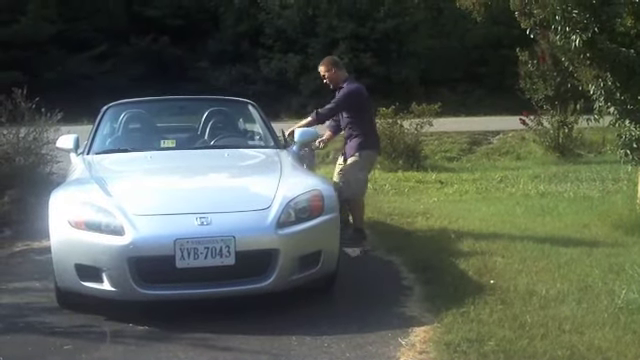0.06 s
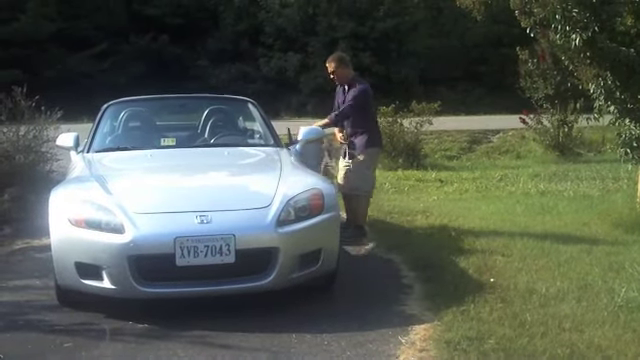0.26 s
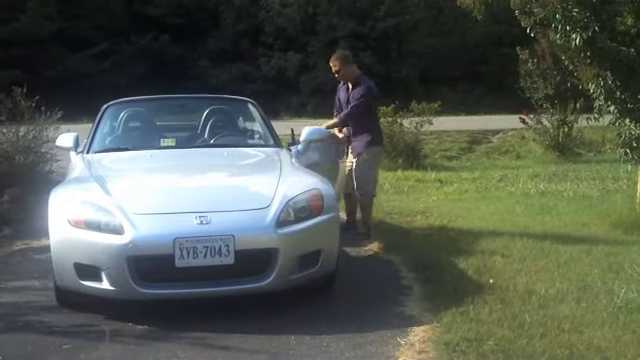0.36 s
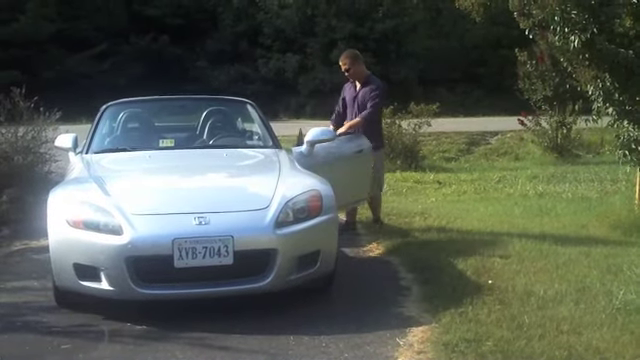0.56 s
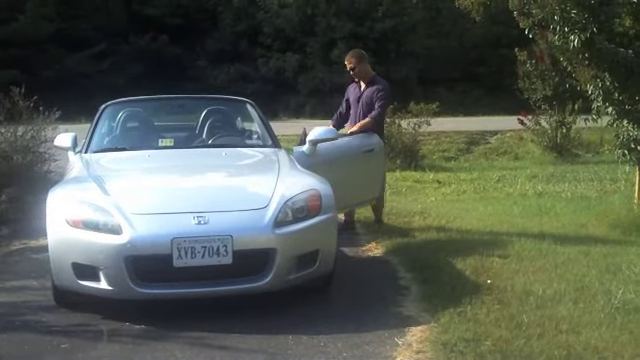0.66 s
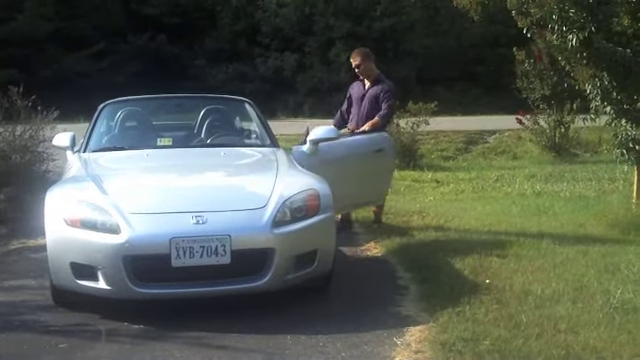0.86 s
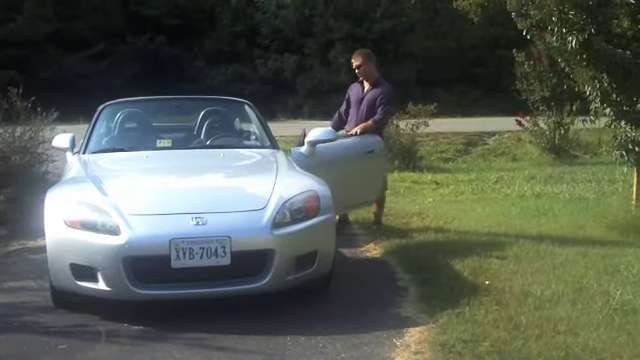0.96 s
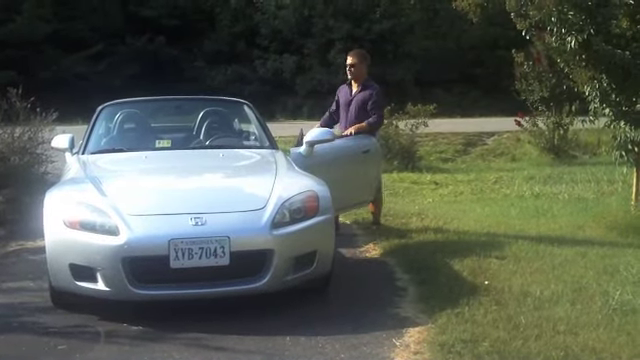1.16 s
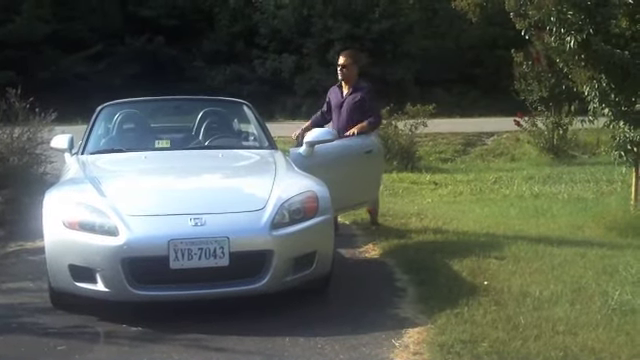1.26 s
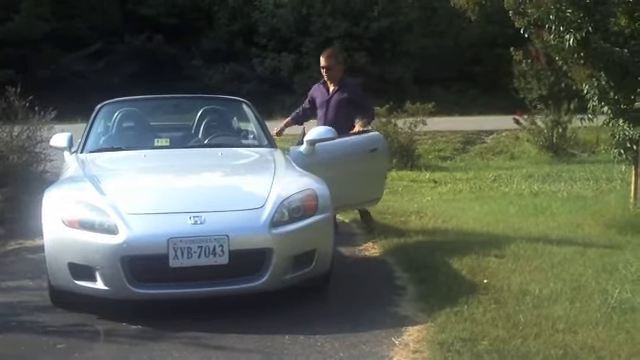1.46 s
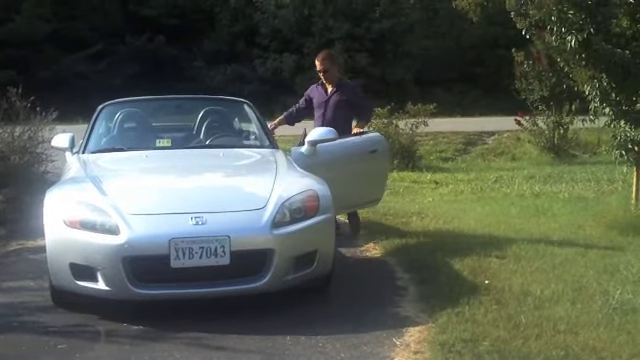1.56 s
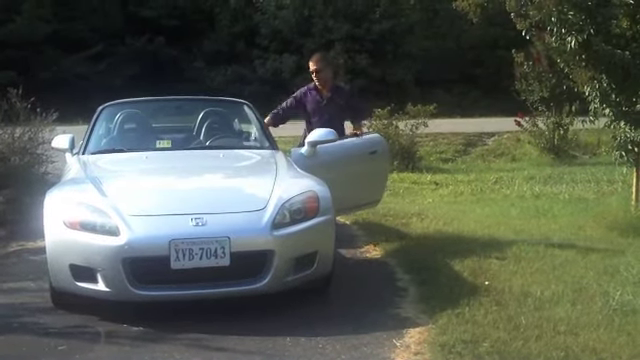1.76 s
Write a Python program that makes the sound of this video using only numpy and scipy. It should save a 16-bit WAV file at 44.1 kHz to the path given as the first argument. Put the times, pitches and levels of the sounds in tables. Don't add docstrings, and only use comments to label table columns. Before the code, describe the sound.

A car door is unlatched with a sharp metallic click and soft thump on a quiet lawn.

```python
import sys
import numpy as np
from scipy import signal
from scipy.fft import rfft, irfft
from scipy.io import wavfile
from scipy.ndimage import uniform_filter1d

SR = 44100
rng = np.random.default_rng(int(sys.argv[2]) if len(sys.argv) > 2 else 0)


def attenuation_scalar(level_db):
    decades = np.asarray(level_db, float) / 20
    return 10 ** decades


def materialize(psi):
    bounded = np.clip(np.atleast_2d(psi).T, -1, 1)
    quanta = np.round(bounded * 32767).astype(np.int16)
    wavfile.write(sys.argv[1], SR, quanta)


N = 79380
TIME_S = np.arange(N) / SR


def unit(x):
    return x / np.sqrt(np.mean(x ** 2))


def noise():
    return rng.standard_normal(N)


def band(x, hz, width_hz):
    return signal.lfilter(*signal.iirpeak(hz, hz / width_hz, SR), x)


def band_twice(x, hz, width_hz):
    return band(band(x, hz, width_hz), hz, width_hz)


def high(x, hz):
    return signal.sosfilt(signal.butter(2, hz, "high", fs=SR, output="sos"), x)


def bell(t, centre, spread):
    return np.exp(-0.5 * ((t - centre) / spread) ** 2)


def ring(x, hz, t60):
    pole = np.exp((2j * np.pi * hz - np.log(1000) / t60) / SR)
    return signal.lfilter([1], [1, -pole], x + 0j).imag


def strike(force, modes):
    return sum(attenuation_scalar(db) * ring(force, hz, t60) for hz, db, t60 in modes)


def push(start_s, length_s):
    u = np.clip((TIME_S - start_s) / length_s, 0, 1)
    return np.sin(np.pi * u) ** 2 * 2 / (length_s * SR)


def fade(start_s, t60):
    return (TIME_S > start_s) * attenuation_scalar(-60 * np.abs(TIME_S - start_s) / t60)


def walk(rate_hz):
    hold = int(SR / rate_hz)
    steps = np.repeat(rng.standard_normal(N // hold + 1), hold)
    return 1.3 * uniform_filter1d(uniform_filter1d(steps, hold), hold)[:N]


# (frequency [Hz], density [dB per Hz])
AIR_SPECTRUM = [(12, -31), (20, 1.5), (59, -0.5), (86, -7), (274, -18), (355, -16), (419, -19), (1050, -27),
                (5600, -42.5), (7280, -52), (12300, -120)]


def air():
    swell_db, flicker_db = 0.76, 1.44
    out, swell = 0, walk(1.49)
    hz_all = np.maximum(np.fft.rfftfreq(N, 1 / SR), 1)
    table_hz, table_db = np.transpose(AIR_SPECTRUM)
    colour = attenuation_scalar(np.interp(np.log(hz_all), np.log(table_hz), table_db))
    for hz in 20 * 2 ** np.arange(0, 9, 0.5):
        share = np.cos(np.pi * np.clip(np.log2(hz_all / hz), -0.5, 0.5)) * colour
        level = attenuation_scalar(swell_db * swell + flicker_db * walk(8.65))
        out = out + level * irfft(share * rfft(noise()), N)
    return attenuation_scalar(-48.5) * unit(out)


# (time [s], spread [s], level [dB])
GRASS_STEPS = [
    (.06, .05, -67),
    (.42, .05, -68),
    (.66, .04, -72),
    (1.27, .07, -64),
    (1.58, .045, -64),
]


def grass():
    shape = sum(attenuation_scalar(db) * bell(TIME_S, s, spread) for s, spread, db in GRASS_STEPS)
    grains = noise() * attenuation_scalar(2.5 * walk(60.9))
    return shape * unit(band(grains, 650, 1100))


# (start [s], length [s], top pitch [Hz], level [dB])
BIRD_NOTES = [
    (.044, .046, 1125, -63),
    (.156, .046, 1125, -61),
    (.444, .042, 1070, -63.5),
    (.612, .033, 1060, -65),
]
# (multiple [1], level [dB], strongest place in note [0-1], spread [0-1])
BIRD_OVERTONES = [
    (1, -20, .5, .5),
    (2, 0, .75, .9),
    (3, -3, .68, .22),
    (4, -7, .27, .11),
]


def bird():
    arch_top, rise, fall = 0.48, 0.17, 0.22
    edge_s, rough_db, wobble = 0.0017, 2.5, 0.013
    out = 0
    for s, length, hz, db in BIRD_NOTES:
        u = np.clip((TIME_S - s) / length, 0, 1)
        rising = rise * (1 - u / arch_top) ** 2
        falling = fall * ((u - arch_top) / (1 - arch_top)) ** 2
        sag = np.where(u < arch_top, rising, falling)
        phase = 2 * np.pi * np.cumsum(hz * (1 - sag + wobble * walk(300))) / SR
        voice = 0
        for multiple, tone_db, place, spread in BIRD_OVERTONES:
            level = attenuation_scalar(tone_db + rough_db * walk(201.2)) * bell(u, place, spread)
            voice = voice + level * np.sin(multiple * phase)
        edge = np.clip(np.minimum(u, 1 - u) * length / edge_s, 0, 1)
        out = out + attenuation_scalar(db) * edge * voice
    return np.sqrt(2) * out


# (delay [s], spread [s], level [dB])
TREE_CLUMPS = [
    (0.063, 0.0056, -21),
    (0.082, 0.0058, -20),
    (0.093, 0.022, -31.5),
    (.14, 0.082, -35),
    (.3, 0.097, -31),
]


def trees(panel, skin, latch, crack):
    delay_s = np.arange(SR // 2) / SR
    shape = sum(attenuation_scalar(db) * bell(delay_s, s, spread) / np.sqrt(spread * SR) for s, spread, db in TREE_CLUMPS)
    sent = attenuation_scalar(-4) * panel + attenuation_scalar(-5.5) * skin + attenuation_scalar(-2.5) * latch
    sent = sent + attenuation_scalar(14) * band_twice(crack, 1700, 1300)
    scatter = rng.standard_normal(len(delay_s)) * attenuation_scalar(1.7 * walk(400)[:len(delay_s)])
    return signal.fftconvolve(sent, shape * scatter)[:N]


# (time [s], level [dB], frequency [Hz], t60 [s])
SMALL_KNOCKS = [
    (.043, -50.5, 497, 0.032),
    (.052, -45.5, 452, 0.033),
    (0.096, -48, 910, 0.015),
    (0.205, -49.5, 1034, 0.1),
    (0.209, -54, 393, 0.058),
    (0.217, -56, 423, 0.083),
    (0.519, -47.5, 412.6, 0.15),
    (0.52, -53, 1022, 0.11),
    (.555, -57, 966, 0.16),
]


def ticks():
    out = 0
    for s, db, hz, t60 in SMALL_KNOCKS:
        lower = ring(push(s, 0.00031), hz, t60)
        upper = ring(push(s, 0.00043), hz * 1.2, t60)
        out = out + attenuation_scalar(db) * (lower + 0.85 * upper)
    return out


# (frequency [Hz], level [dB], t60 [s])
PANEL_MODES = [
    (132.4, -1, 0.12),
    (159, 1, 0.078),
]
# (frequency [Hz], level [dB], t60 [s])
SKIN_MODES = [
    (205, -31, 0.25),
    (250.8, 0, 0.18),
    (331, -0.5, 0.12),
    (369, 0, 0.077),
    (412, -2.5, 0.074),
    (565, -21.5, 0.34),
]
# (frequency [Hz], level [dB], t60 [s])
LATCH_MODES = [(840, -23.5, 0.15), (928, -10, 0.077), (988, -7, 0.085), (1040.6, 0, 0.067),
               (1134.5, -7, 0.11), (1343, -16, 0.086), (1486, -19, 0.058), (1624, -21.5, 0.09),
               (1886, -16, 0.023), (2496, -7.5, 0.016), (2723, -19.5, 0.059), (3520, -35, 0.042),
               (4246, -8, 0.022), (5270, -17, 0.03)]
# (time [s], level on panel [dB], level on skin [dB])
DOOR_TUGS = [
    (0.2362, -32, -29),
    (0.2394, -57, -23),
    (0.2424, -28, -38),
    (0.2503, -20, -29.5),
    (0.2736, -45, -32),
]
# (time [s], ring level [dB], crack level [dB])
LATCH_BLOWS = [
    (.2385, -19.5, -47.5),
    (0.2411, -31.5, -31.5),
    (0.244, -36.5, -57),
    (0.2525, -30.5, -41),
    (.2600, -38, -64),
]


def door():
    skin_push_s, latch_push_s = 0.0017, 0.000065
    panel_force = sum(attenuation_scalar(panel_db) * push(s, 2 * skin_push_s) for s, panel_db, _ in DOOR_TUGS)
    skin_force = sum(attenuation_scalar(skin_db) * push(s, skin_push_s) for s, _, skin_db in DOOR_TUGS)
    latch_force = sum(attenuation_scalar(ring_db) * push(s, latch_push_s) for s, ring_db, _ in LATCH_BLOWS)
    panel = high(-strike(panel_force, PANEL_MODES), 89)
    skin = -strike(skin_force, SKIN_MODES)
    latch = high(strike(latch_force, LATCH_MODES), 760)
    crack_shape = sum(attenuation_scalar(crack_db) * fade(s, 0.024) for s, _, crack_db in LATCH_BLOWS)
    crack = crack_shape * unit(band_twice(noise(), 2330, 5200))
    rattle_shape = attenuation_scalar(-43) * fade(LATCH_BLOWS[0][0], 0.13)
    rattle = rattle_shape * unit(band_twice(noise(), 1900, 2600))
    return panel, skin, latch, crack + rattle


def scene():
    parts = door()
    heard = air() + grass() + bird() + ticks() + sum(parts) + trees(*parts)
    return np.tile(heard, (2, 1))


# (from frequency [Hz], kept above level [dB])
TREBLE_PATCHES = [
    (12500, -85.5),
    (13300, -85.5),
    (14200, -89.5),
]


def patchy(x):
    patch_s, chance_db = 0.008, 4.5
    size = int(patch_s * SR)
    spare_db = 9 * np.clip(1 - TIME_S / 0.95, 0, 1)
    for hz, keep_db in TREBLE_PATCHES:
        top = signal.sosfiltfilt(signal.butter(8, hz, "high", fs=SR, output="sos"), x)
        level_db = 10 * np.log10(uniform_filter1d(top[0] ** 2, 2 * size) + 1e-14)
        level_db = level_db + chance_db * walk(1 / patch_s)
        dropped = 1.0 * (level_db + spare_db < keep_db)
        x = x - top * uniform_filter1d(dropped, size // 2)
    return x


def band_limit(x):
    return signal.sosfilt(signal.butter(12, 15940, fs=SR, output="sos"), x)


CHANNEL_OFFSETS = [
    [-.0305],
    [.0282],
]


def record(dry):
    hissy = dry + attenuation_scalar(-69.5) * rng.standard_normal(dry.shape)
    x = signal.sosfilt(signal.cheby1(8, 0.5, 5620, fs=SR, output="sos"), hissy)
    slow = signal.resample_poly(x, 40, 147, axis=1)
    stairs = np.repeat(slow, 4, axis=1)
    held = signal.resample_poly(stairs, 147, 160, axis=1)[:, :N]
    held = signal.sosfilt(signal.ellip(8, 0.2, 70, 14900, fs=SR, output="sos"), held)
    mix = patchy(held) + np.array(CHANNEL_OFFSETS)
    return band_limit(mix)


dry = scene()
out = record(dry)
materialize(out)
```